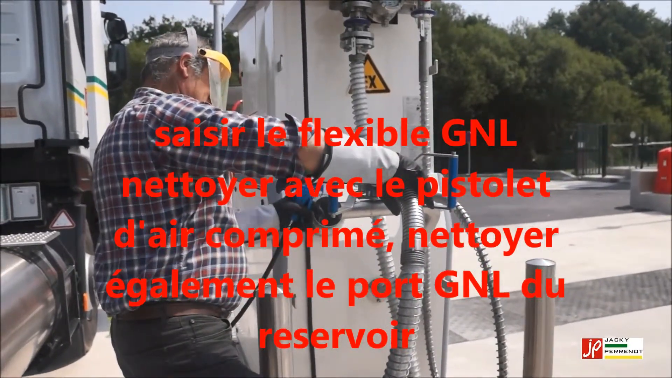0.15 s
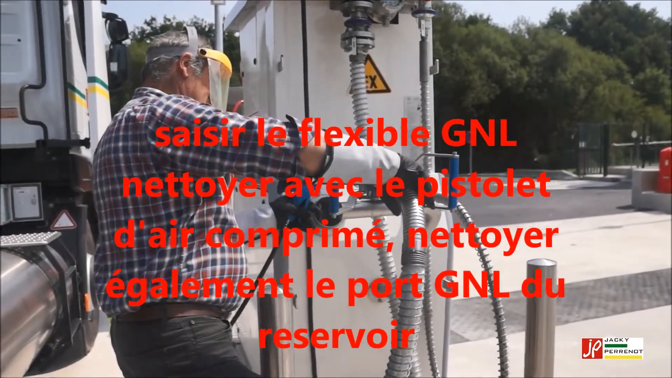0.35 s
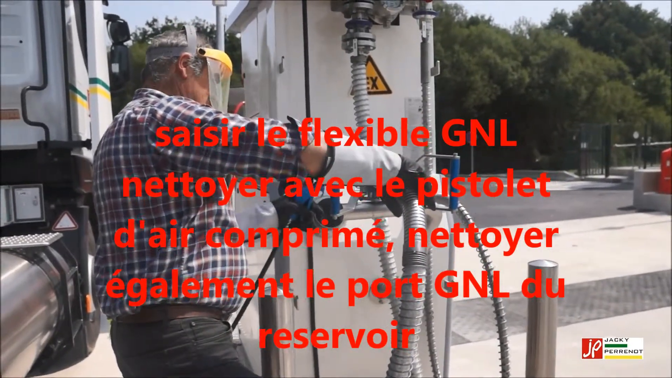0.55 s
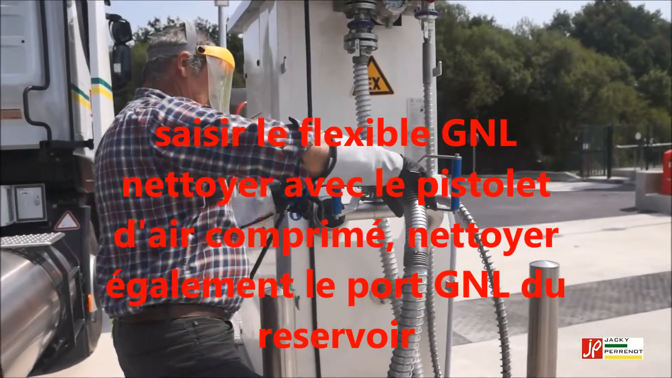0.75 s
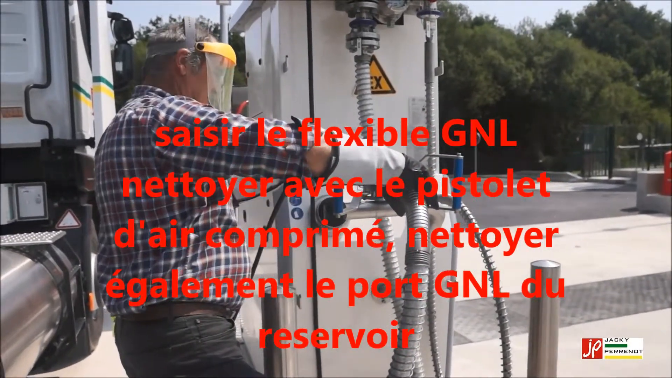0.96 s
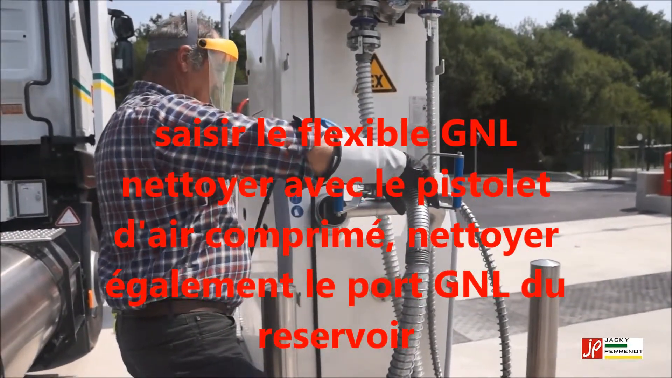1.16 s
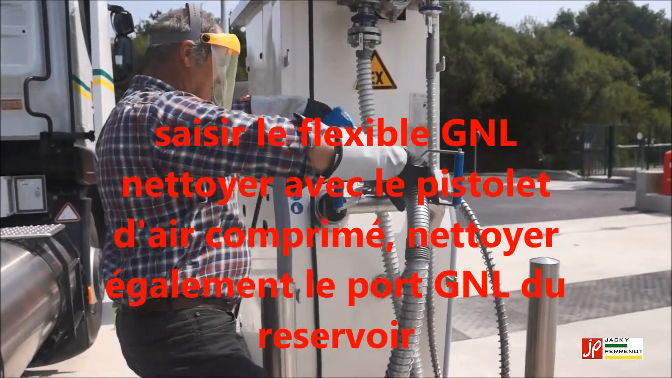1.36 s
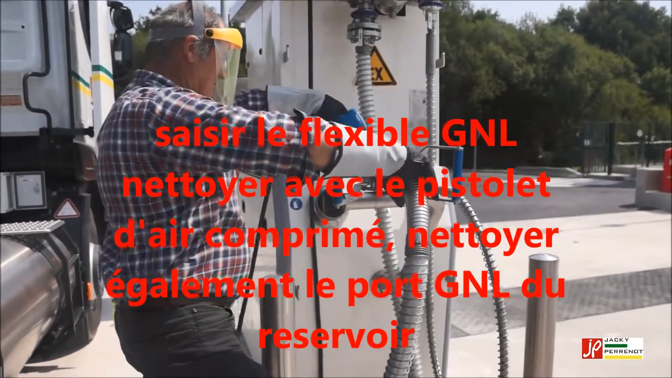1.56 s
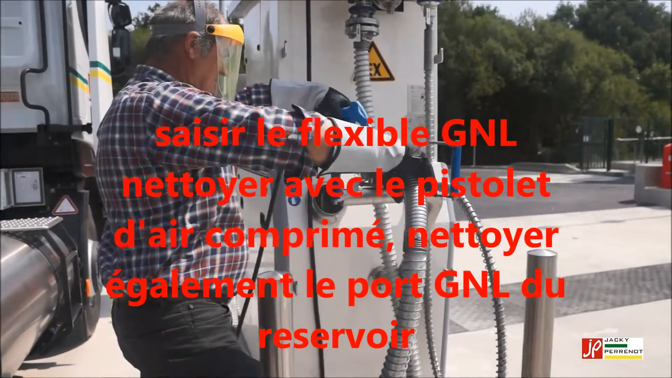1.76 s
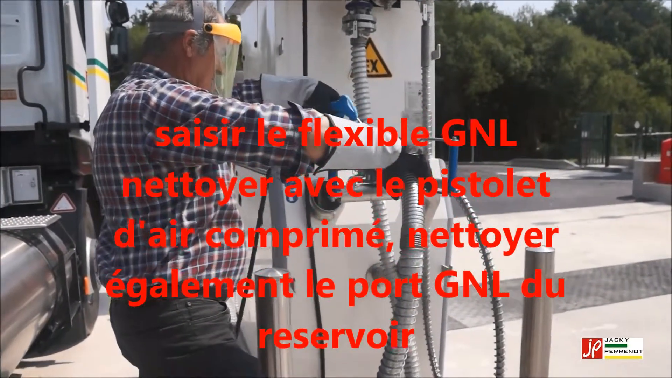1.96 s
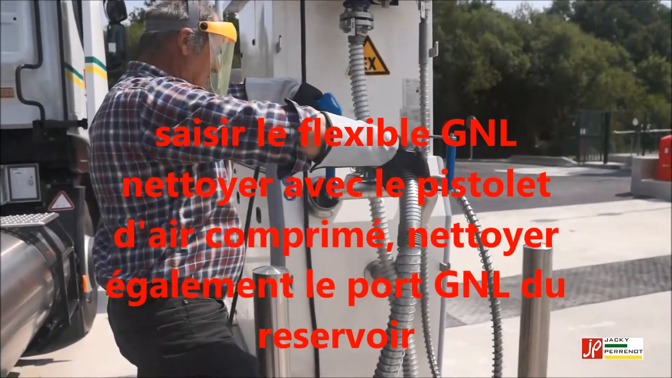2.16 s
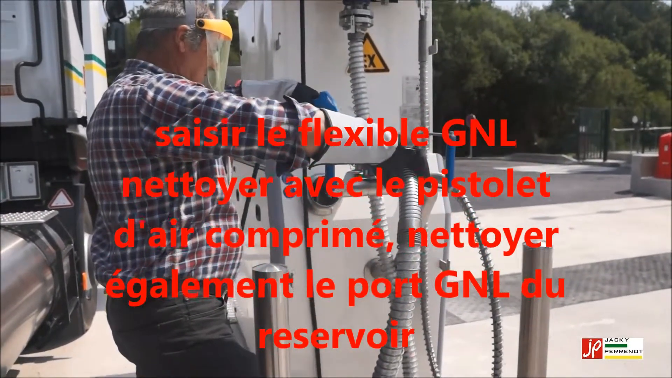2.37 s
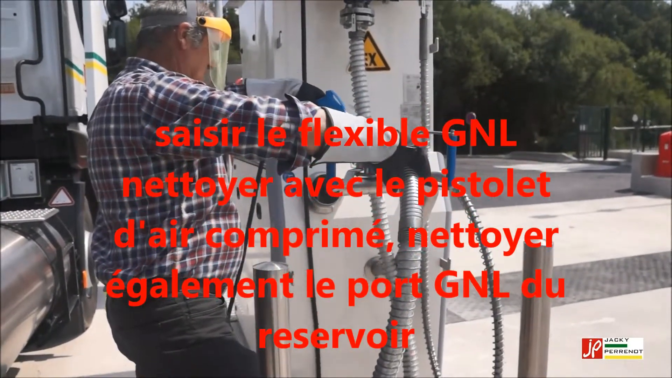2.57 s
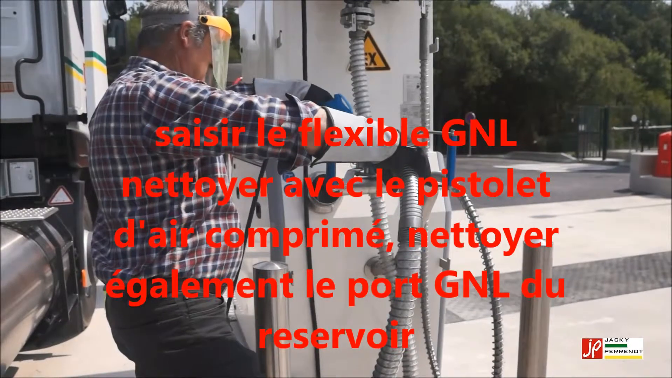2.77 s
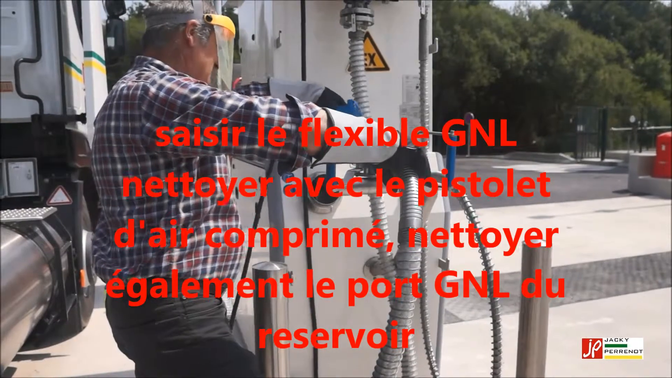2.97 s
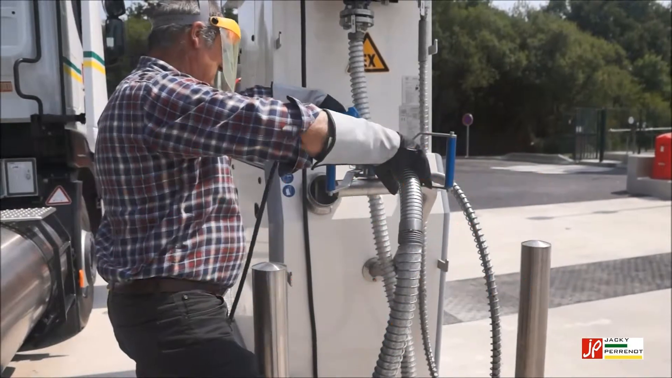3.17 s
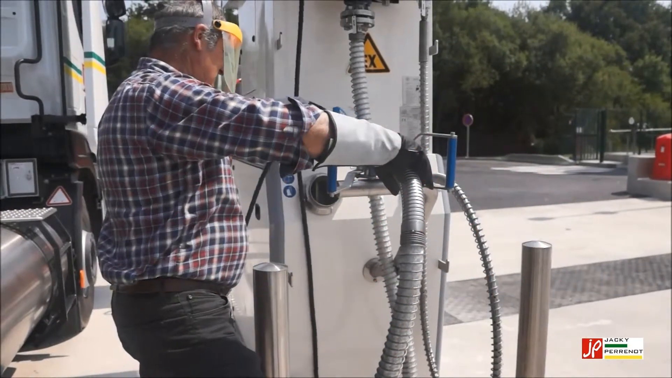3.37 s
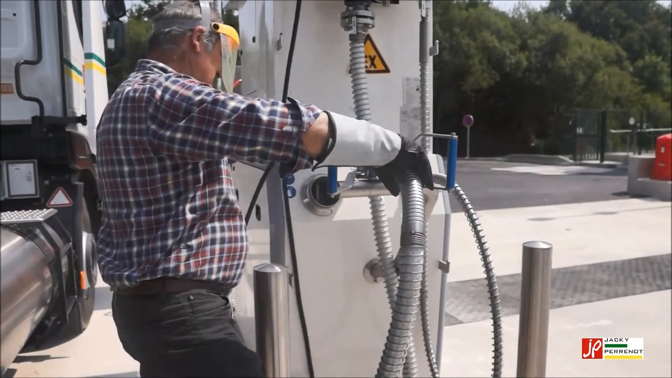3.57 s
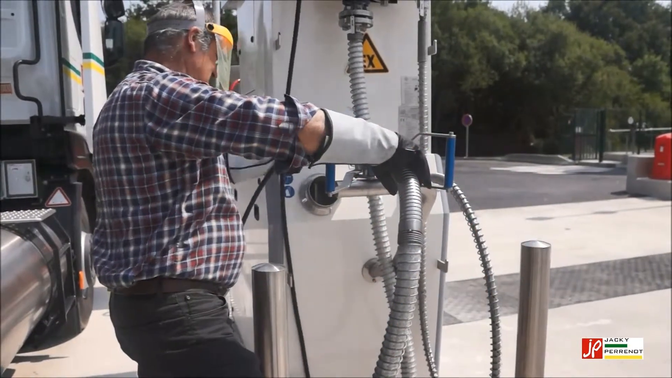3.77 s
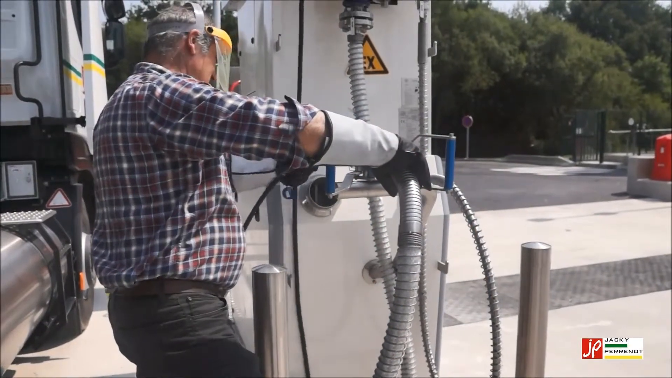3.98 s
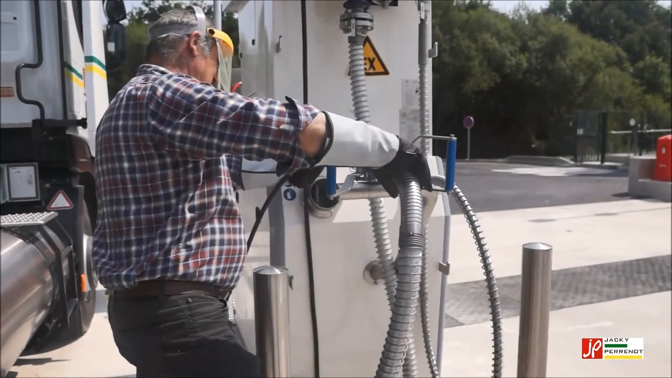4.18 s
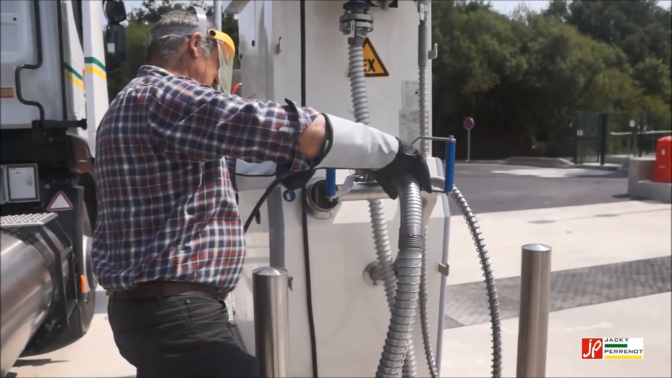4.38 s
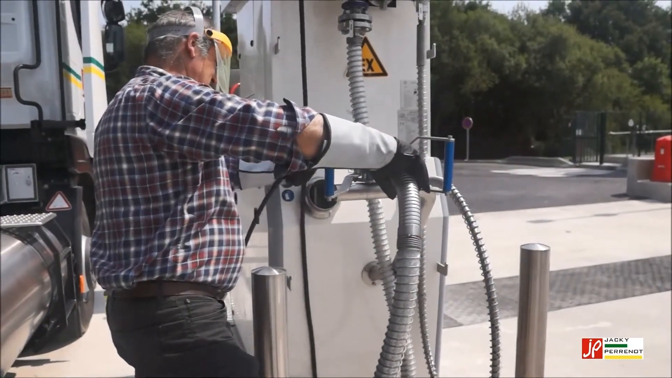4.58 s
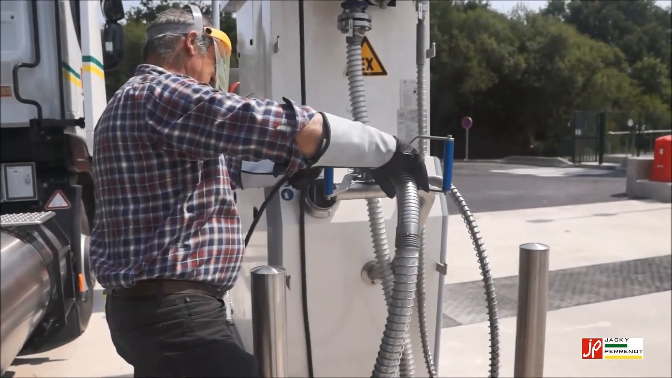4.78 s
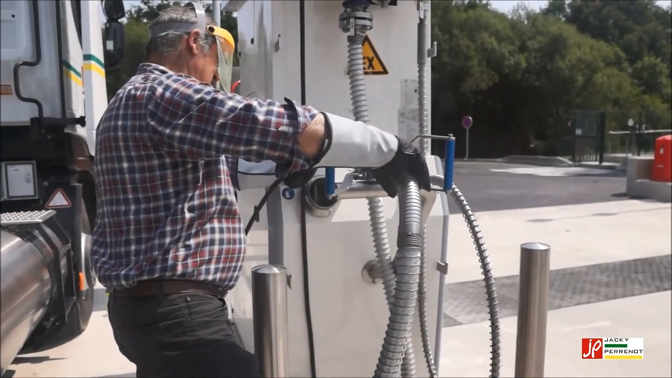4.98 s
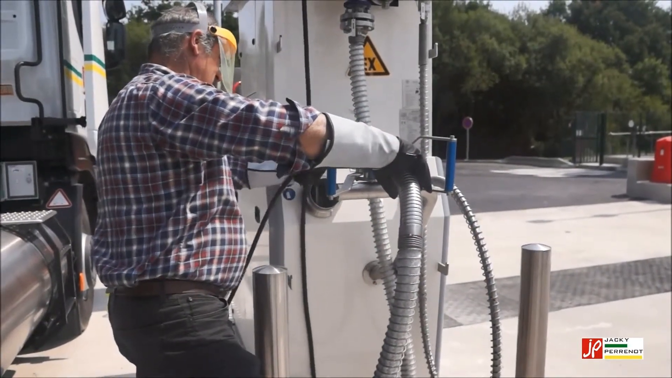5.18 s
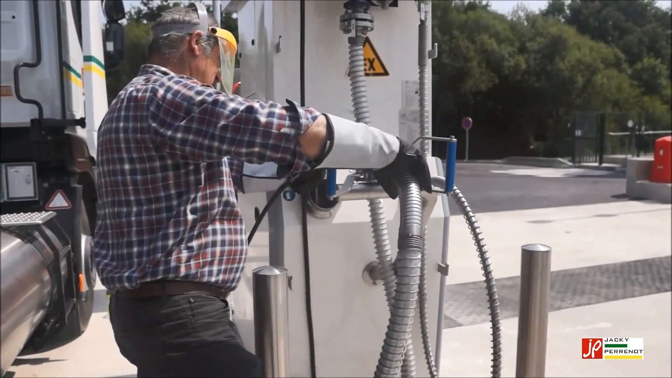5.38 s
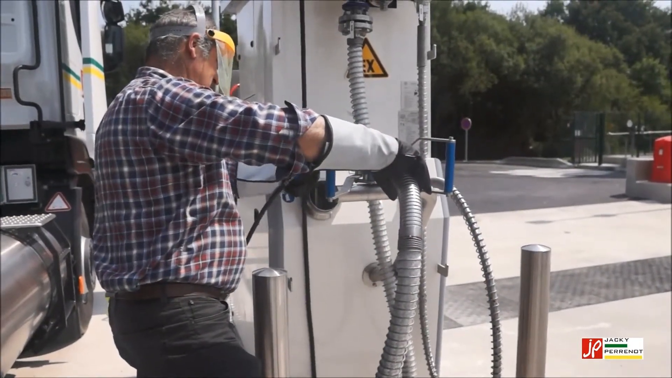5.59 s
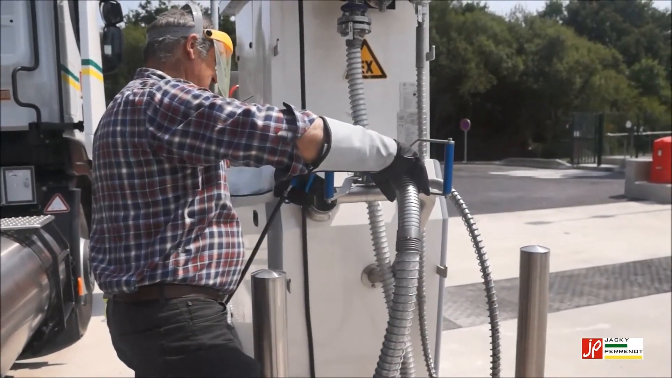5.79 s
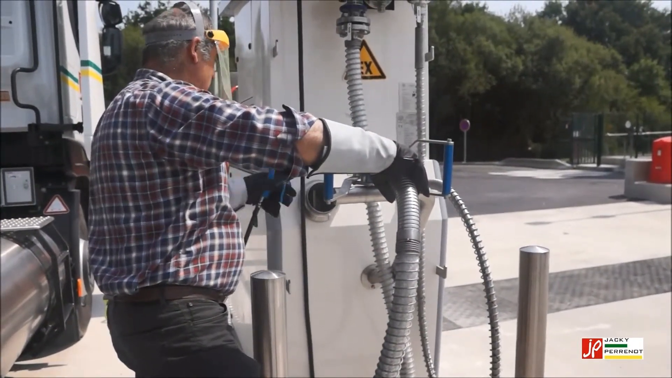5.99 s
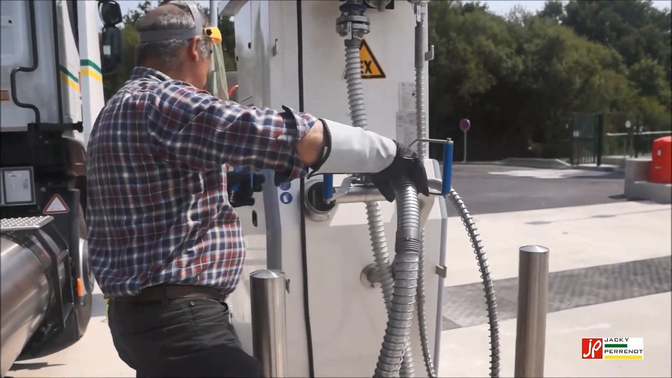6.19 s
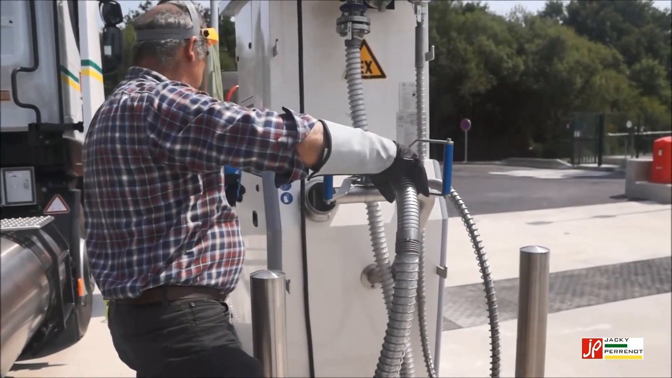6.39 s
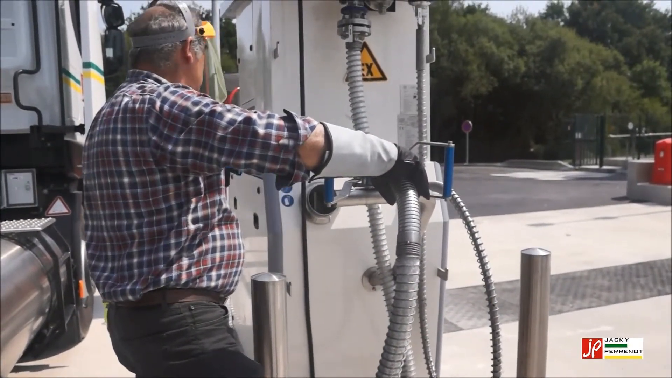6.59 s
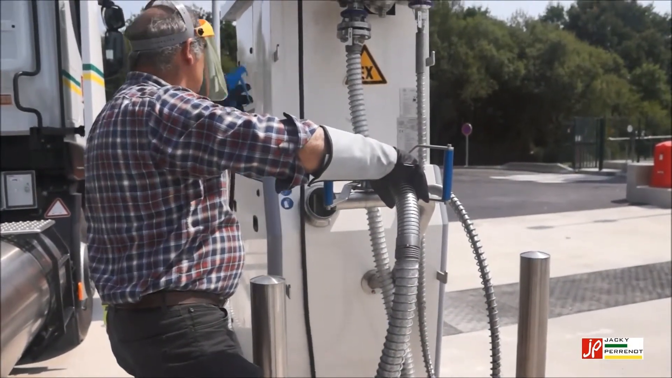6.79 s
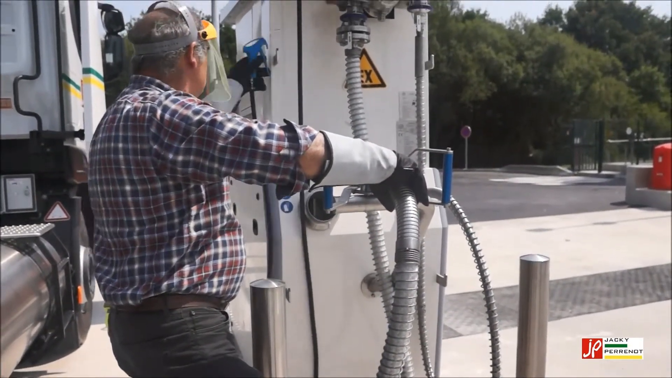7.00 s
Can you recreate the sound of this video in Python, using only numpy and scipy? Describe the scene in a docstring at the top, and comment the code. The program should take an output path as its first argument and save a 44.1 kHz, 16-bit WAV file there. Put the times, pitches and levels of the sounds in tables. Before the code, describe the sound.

Harsh, bright air blasts sweep over hollow metal fittings, whistling at the edges, before stopping abruptly over a quiet droning machine outdoors.

```python
"""A compressed-air blow gun cleans a fuel nozzle, mouth then side, and then a port, outdoors by a hum.
From the start, shaped noise hisses, rushes in hollows and sings on rims as a swept jet catches on them;
wavering sines in droning rumble make the machine hum. From about 3.9 s narrow noise bands whistle in the port.
At 5.7 s the valve shuts and a dull rush bleeds away; the hum remains, with rubs of resonated noise from
the hose and, near 6.6 s, two gliding sines as a bird's chirp. Echoes and scatter surround the gun and hose."""
import sys
import numpy as np
from scipy import signal
from scipy.fft import rfft, irfft
from scipy.io import wavfile

SR = 44100
rng = np.random.default_rng(int(sys.argv[2]) if len(sys.argv) > 2 else 0)


def wrap_up_sound(samples):
    """Save the sound to the file named by the first command line argument, as 16-bit audio."""
    columns = np.atleast_2d(samples).T
    # keep every value between -1 and 1, then stretch to whole-number steps
    tamed = np.clip(columns, -1, 1)
    steps = np.round(tamed * 32767).astype(np.int16)
    wavfile.write(sys.argv[1], SR, steps)


N = 310464
TIME_S, BINS_HZ = np.arange(N) / SR, np.fft.rfftfreq(N, 1 / SR)
TO_SIDE_S, TO_PORT_S = 1.49, 3.53  # jet moves from nozzle mouth to side, then to port


def gain_of(db):
    """Decibels to amplitude."""
    return 10 ** (np.asarray(db) / 20)


def evened(x):
    """Scales to rms 1."""
    return x / np.sqrt(np.mean(x ** 2) + 1e-20)


def follow(rows):
    """Every column of a curve, interpolated at each sample."""
    t_s, *columns = np.transpose(rows)
    return [np.interp(TIME_S, t_s, column) for column in columns]


def read(points):
    """A spectrum at each bin, joined on a log-frequency axis."""
    hz, value = np.transpose(points)
    return np.interp(np.log(BINS_HZ + 1), np.log(hz + 1), value)


def lifts(modes):
    """The dB that a set of resonances adds at each bin."""
    return sum(db / (1 + (2 * (BINS_HZ - hz) / width_hz) ** 2) for hz, width_hz, db in modes)


def noise(db):
    """Noise of rms 1 with the given spectral shape in dB."""
    return evened(irfft(rfft(rng.standard_normal(N)) * gain_of(db), N))


def wander(rate_hz, size=4000):
    """Slow random curve of rms 1, joined from 2 * rate_hz points a second."""
    return evened(np.interp(TIME_S * 2 * rate_hz, np.arange(size), rng.standard_normal(size)))


def after(t_s, shift_s=0.11):
    """Rises smoothly from 0 to 1 around t_s."""
    return (1 + np.tanh((TIME_S - t_s) / shift_s)) / 2


def held(start_s, length_s):
    """Attack, hold and release of one event, from 0 to 1."""
    attack_s, let_go_s = 0.026, 0.032
    attack = (TIME_S - start_s) / attack_s
    release = (start_s + length_s - TIME_S) / let_go_s
    return np.clip(np.minimum(attack, release), 0, 1)


def resonate(x, hz, width_hz):
    """One-pole resonance of gain 1 whose centre follows the curve hz."""
    turn = np.exp(2j * np.pi * np.cumsum(hz * np.ones(N)) / SR)
    r = np.exp(-np.pi * width_hz / SR)
    return 2 * (turn * signal.lfilter([1 - r], [1, -r], x / turn)).real


def sideways(x, width):
    """A part of the sound that the two channels hear with opposite sign."""
    side = irfft(rfft(x) * gain_of(read(width)), N)
    return np.array([side, -side])


def scatter(x, t60_s, count):
    """Dense short reflections whose paths are renewed count times over the scene."""
    hop, size = N // count + 1, SR // 25
    taps = rng.standard_normal((count + 2, size)) * gain_of(-60 * TIME_S[:size] / t60_s)
    taps /= np.linalg.norm(taps, axis=1, keepdims=True)
    pieces = np.pad(x, (hop, (count + 2) * hop - N)).reshape(-1, hop)
    pieces = np.hstack([pieces[:-1], pieces[1:]]) * signal.windows.cosine(2 * hop)
    wet = signal.fftconvolve(pieces, taps, axes=1)
    out = np.zeros((count + 3) * hop + size)
    for k, piece in enumerate(wet):
        out[k * hop:k * hop + len(piece)] += piece
    return out[hop:hop + N]


def tail(x, t60_s, delay_s):
    """Diffuse reflections that die away, unrelated in the two channels."""
    t_s = TIME_S[:SR]
    taps = rng.standard_normal((2, SR)) * gain_of(-60 * t_s / t60_s) * (t_s > delay_s)
    return signal.fftconvolve(x[None], taps / np.linalg.norm(taps[0]), axes=1)[:, :N]


def aim():
    """The slow sweep plus every catch, slip and flare: levels of the air's parts, and the edge tone."""
    # hand sweep between catches: t/s, hiss/dB, fizz against hiss/dB, hollow rush/dB, rim tone/dB
    sweep = [(0.0, -20.5, 0, -22.0, -25.5), (0.35, -23.5, -1.5, -23, -22), (0.8, -22.5, -4.5, -27.0, -27),
             (1.25, -20.5, -3, -22.5, -26), (1.47, -24.0, 1, -22.5, -21), (1.55, -25.5, 1, -31, -27.5),
             (1.72, -24.5, -3, -28.5, -26.0), (2.0, -26, 3, -22, -26), (2.4, -22.0, 3, -26.5, -24.0),
             (2.75, -22, -4, -26.5, -23.5), (3.0, -24.5, 2, -27, -25), (3.3, -23, -0.5, -26, -23.5),
             (3.85, -20.0, 0.5, -24, -20), (4.06, -26, -8, -28.0, -21.5), (4.33, -22.5, -7, -30.5, -19.5),
             (4.65, -26, 0, -31, -16.5), (5.13, -21.5, 1, -29.5, -23.5), (5.68, -23, 4, -27, -22.5)]
    # jet catches a part: start/s, length/s, hiss change/dB, hollow change/dB, rim change/dB, edge f/Hz
    catches = [(0.058, 0.12, 4.0, 0.5, 5, 4930.0), (0.252, 0.108, 4.5, 2, 4.5, 4560),
               (0.377, 0.098, 3.5, 3.5, 6, 4330), (0.48, 0.093, 5, 0.0, 0.5, 4410.0),
               (0.601, 0.12, 3.5, 4.5, 4, 4460), (0.712, 0.18, 0.5, 6.5, 9, 4560.0),
               (0.865, 0.22, 4.5, 0.0, 6, 5160), (1.046, 0.14, -1.5, 3, 7.5, 4940.0),
               (1.156, 0.066, 3.5, 4.5, 8, 4410.0), (1.262, 0.16, 0.5, 2.5, 7, 4140),
               (1.462, 0.058, 1.5, 2.5, 2.5, 4870.0), (1.754, 0.13, 3.5, 1, 0.5, 4990.0),
               (1.88, 0.1, 2.5, 1.5, 5, 4370), (1.981, 0.041, 1, 1, 2, 4370.0),
               (2.031, 0.076, 2.0, -0.5, 8, 4330.0), (2.138, 0.1, 4.5, -1, 2.5, 4580.0),
               (2.29, 0.069, 3, -4, 3.0, 5190.0), (2.491, 0.081, 4.5, -3, -1.5, 5160.0),
               (2.58, 0.1, 1, 1.5, 2, 4570.0), (2.766, 0.1, 3, 3.5, 0.5, 4500),
               (2.831, 0.077, 0.0, 4, 5, 4990.0), (3.394, 0.1, 2.5, 0.5, 2, 4770),
               (3.525, 0.083, 1.5, 7.5, 5.5, 4630), (3.666, 0.17, -0.5, 2.0, 0.0, 4360),
               (3.853, 0.17, 1.5, 7.5, 2, 4800), (3.972, 0.11, 4.5, -3.5, 6.5, 5250),
               (4.06, 0.23, 4.5, 5.5, 2.5, 4630), (4.363, 0.081, 0.5, 11.5, 5.0, 4350),
               (4.43, 0.11, 4, 11, 0.5, 4600), (4.519, 0.2, 7, 5, -2.5, 4830), (4.681, 0.15, 4, 8, 1, 4760),
               (4.895, 0.2, 0.5, 7, 5.5, 4670.0), (5.19, 0.057, 2.5, 7.0, 7, 4660),
               (5.287, 0.165, 1, 4, 6.5, 4340), (5.457, 0.16, -0.5, 1, 3.5, 4540.0),
               (5.612, 0.049, 1.5, 7.5, 10, 4400)]
    # top of the hiss flares up: start/s, length/s, fizz lift/dB
    flares = [(0.454, 0.19, 6.5), (0.681, 0.082, 15), (0.87, 0.184, 5), (2.539, 0.309, 7),
              (3.678, 0.167, 7), (4.203, 0.108, 12), (4.796, 0.053, 9)]
    # jet slips off the port's opening: start/s, length/s, hollow rush change/dB
    slips = [(4.0, 0.08, -1.5), (4.272, 0.085, -1), (4.833, 0.09, -2), (5.075, 0.13, -1)]
    slip_hiss_share, rest_hz = 0.44, 4950

    hiss_db, fizz_db, hollow_db, rim_db = follow(sweep)
    edge_hz = rest_hz
    for start_s, length_s, hiss_lift, hollow_lift, rim_lift, hz in catches:
        contact = held(start_s, length_s)
        hiss_db = hiss_db + hiss_lift * contact
        hollow_db = hollow_db + hollow_lift * contact
        rim_db = rim_db + rim_lift * contact
        edge_hz = edge_hz + (hz - rest_hz) * contact
    slip_db = sum(dip * held(start_s, length_s) for start_s, length_s, dip in slips)
    flare_db = sum(lift * held(start_s, length_s) for start_s, length_s, lift in flares)
    return hiss_db + slip_hiss_share * slip_db, fizz_db + flare_db, hollow_db + slip_db, rim_db, edge_hz


def blown(colour):
    """Turbulence coloured by the resonances of whichever part the jet is aimed at."""
    # resonances of the metal parts: f/Hz, width/Hz, lift/dB
    nozzle_mouth = [(960, 490, 5), (1485, 270, 3), (1780, 210, 6.5), (2136, 190, 6), (2480, 97, 5.5),
                    (2760, 75, 8), (3690, 1400, 4), (5840, 120, 5), (6840, 200, 3.5)]
    nozzle_side = [(904, 250, 4.7), (1520, 350, 3.1), (1810, 150, 3), (2600, 140, 1.1), (2900, 320, 2),
                   (3980, 230, 2.8), (4560, 150, 4.9), (5620, 160, 3.1), (6620, 340, 4.5)]
    port_modes = [(690, 90, 1.6), (887, 190, 5.2), (1576, 200, 4.9), (1803, 85, 5.8), (2116, 100, 4.7),
                  (2720, 120, 4.2), (4480, 240, 1.9), (9550, 220, 5.2)]
    side, port = after(TO_SIDE_S), after(TO_PORT_S)
    shares = (1 - side, side * (1 - port), port)  # of power
    aims = zip(shares, (nozzle_mouth, nozzle_side, port_modes))
    base_db = read(colour)
    return sum(np.sqrt(share) * noise(base_db + lifts(modes)) for share, modes in aims)


def free_jet(level_db, sharp_db, hiss_db=0.16, fizz_db=-1):
    """The hiss of the jet itself; its finest eddies add a fizz on top."""
    # noise spectra, relative: f/Hz, level/dB
    jet_colour = [(30, -47), (150, -24), (350, -24), (1500, -19.5), (5500, -9.5), (7200, -8.5), (8000, -4),
                  (9300, -1), (10400, 0), (11500, -5), (12500, -12.5), (14000, -7), (16000, -21)]
    fizz_colour = [(8000, -60), (12300, -11), (13200, -3.5), (14200, 0), (15800, -.5)]
    hiss = gain_of(hiss_db) * blown(jet_colour)
    fizz = gain_of(fizz_db + sharp_db) * noise(read(fizz_colour))
    return gain_of(level_db) * (hiss + fizz)


def hollow_rush(level_db, trim_db=-1.14, flutter_db=0.56):
    """A throaty rush, fluttering as the air enters and spills from a hollow."""
    # noise spectrum, relative: f/Hz, level/dB
    hollow_colour = [(30, -70.5), (120, -29), (320, -16), (520, -17.5), (660, -9), (1200, -7.5), (1500, -2),
                     (2000, -1.5), (3000, -3.5), (3900, -3), (8000, -33)]
    flutter = wander(rate_hz=35)
    return gain_of(level_db + trim_db + flutter_db * flutter) * blown(hollow_colour)


def rim_tone(level_db, hz, broad_db=-3.0, tone_db=-5, width_hz=550, waver=0.074, flutter_db=0.0,
             growth=0.52, port_db=-4):
    """The jet flaps across a rim: a bright rush with a fuzzy, wavering edge tone, weaker at the port."""
    # noise spectrum, relative: f/Hz, level/dB
    rim_colour = [(300, -62), (2200, -22), (2800, -18), (3500, -0.5), (4500, -0.5), (5700, 1), (6800, 1.5),
                  (7800, -8), (12000, -8.5)]
    rush = gain_of(broad_db) * blown(rim_colour)
    centre_hz = hz * (1 + waver * wander(rate_hz=56))
    tone = noise(read(rim_colour))
    for _ in range(2):
        tone = resonate(tone, centre_hz, 2 * width_hz)
    lock_db = growth * (level_db - np.median(level_db))  # tone stands out when the rim is hit squarely
    tone = gain_of(tone_db + lock_db + port_db * after(TO_PORT_S)) * evened(tone)
    return gain_of(level_db + flutter_db * wander(rate_hz=57)) * (rush + tone)


def blow_gun(unsteady_db=0.5):
    """One unsteady flow sags as the trigger eases; the valve shuts and a dull, toneless rush bleeds away."""
    ease_s, ease_db, ease_tones_db = 0.054, -4, -9
    release_s, valve_t60_s = 5.702, 0.036
    bleed_hiss_db, bleed_rush_db, bleed_t60_s = -25, -14, 0.73

    hiss_db, fizz_db, hollow_db, rim_db, edge_hz = aim()
    easing = np.clip(1 - (release_s - TIME_S) / ease_s, 0, 1)
    shut_s = np.maximum(TIME_S - release_s, 0)
    valve_db, bleed_db = -60 * shut_s / valve_t60_s, -60 * shut_s / bleed_t60_s
    hiss = gain_of(np.maximum(valve_db, bleed_hiss_db + bleed_db)) * free_jet(hiss_db, fizz_db)
    rush = gain_of(np.maximum(valve_db, bleed_rush_db + bleed_db)) * hollow_rush(hollow_db)
    tones = rim_tone(rim_db, edge_hz) + port_whistle((hollow_db + rim_db) / 2)
    tones = gain_of(valve_db) * tones
    air = gain_of(ease_db * easing) * (hiss + rush) + gain_of(ease_tones_db * easing) * tones
    return gain_of(unsteady_db * wander(rate_hz=20)) * air


def machine(lines_db=-2.0, rumble_db=-40, waver=0.00613, throb_db=2, left_db=0.9, lead_rad=0.17):
    """A running machine to the left: wavering lines, leading in phase there, in a droning rumble."""
    # hum lines, relative: f/Hz, level/dB
    hum = [(100.7, -63), (166, -52), (182, -52), (218.8, -45), (381, -52.5), (434, -50.5), (666, -55),
           (840, -68), (1002, -58.5)]
    # rumble spectrum, relative: f/Hz, level/dB
    rumble_colour = [(15, -63.5), (25, -42), (66, -32), (98, -13.5), (131, -13.5), (163, -7), (213, -8.5),
                     (250, -14), (427, -13.5), (769, -9.5), (1000, -11.5), (2850, -28.5), (4150, -32),
                     (4500, -32), (15000, -47)]
    # drone resonances of the rumble: f/Hz, width/Hz, lift/dB
    drone = [(176, 25, 5.5), (338, 115, 8.5), (6300, 260, 9.5), (11800, 400, 7)]
    # level at which the hum is heard, held down under the loud hiss, recovering after it: t/s, level/dB
    hum_level = [(0, -4), (1.4, -6), (2.5, -5.5), (3.4, -1.5), (4.1, -7.5), (5.6, -4.5), (5.9, -1),
                 (6.3, -1.5), (6.7, 1), (7.04, 1.5)]
    # rumble, side against middle: f/Hz, level/dB
    rumble_width = [(60, -18), (180, -66), (550, -24), (1650, -0.5), (4970, -1), (15000, 1.5)]

    sides = np.array([[1], [-1]])  # left, right
    warped_s = np.cumsum(1 + waver * wander(rate_hz=7.9)) / SR
    lines = 0
    for hz, db in hum:
        line_gain = gain_of(db + throb_db * wander(rate_hz=3.5))
        lines = lines + line_gain * np.sin(2 * np.pi * hz * warped_s + lead_rad * sides)
    colour_db = read(rumble_colour) + lifts(drone)
    rumble = noise(colour_db) + sideways(noise(colour_db), rumble_width)
    level_db = follow(hum_level)[0] + left_db * sides
    return gain_of(level_db) * (gain_of(lines_db) * np.sqrt(2) * lines + gain_of(rumble_db) * rumble)


def forecourt(x, direct_db=-0.5, near_db=-8.5, truck_db=-14, far_db=-22, air_hz=7000):
    """Single echoes and shifting scatter from cabinet and man, a truck's short ring, a dull open-air tail."""
    # echoes from the cabinet and the man: delay to left/ms, delay to right/ms, gain
    echoes = [(.68, 0.696, 0.071), (1.149, 1.29, 0.02), (1.85, 1.3, 0.045), (2.9, 4.1, 0.18),
              (4.5, 4.55, 0.13)]
    paths = 1
    for left_ms, right_ms, gain in echoes:
        delays_s = np.array([[left_ms], [right_ms]]) / 1000
        paths = paths + gain * np.exp(-2j * np.pi * BINS_HZ * delays_s)
    direct = gain_of(direct_db) * irfft(rfft(x) * paths, N)
    near = scatter(x, t60_s=0.059, count=72)
    truck = tail(x, t60_s=0.22, delay_s=0.008)
    dulled = irfft(rfft(x) / (1 + (BINS_HZ / air_hz) ** 2), N)
    far = tail(dulled, t60_s=0.6, delay_s=0.02)
    return direct + gain_of(near_db) * near + gain_of(truck_db) * truck + gain_of(far_db) * far


def port_whistle(flow_db, drive=0.5, flicker_db=1.4, start_s=3.9, rise_s=0.071):
    """Narrow, airy pipe tones that flicker, and swell with the air crossing the port's rim and entering it."""
    # pipe tones, relative: f/Hz, width/Hz, level/dB
    whistles = [(2798, 60, -35.5), (4376, 100, -30.5), (4574, 90, -30)]
    pipes = 0
    for hz, width_hz, db in whistles:
        band_db = -20 * np.log10(1 + (1.26 * (BINS_HZ - hz) / width_hz) ** 2)
        pipes = pipes + gain_of(db + flicker_db * wander(rate_hz=12)) * noise(band_db)
    drive_db = drive * (flow_db - np.median(flow_db))
    return after(start_s, rise_s) * gain_of(drive_db) * pipes


def hose(trim_db=-2):
    """Brief rubs ring the metal hose."""
    # scrapes, relative: peak t/s, 1/e half-length/s, level/dB
    scrapes = [(5.99, .018, -52), (6.235, .025, -53), (6.6, 0.032, -53), (6.96, .02, -55)]
    # ring of the hose, relative: f/Hz, nominal width/Hz, level/dB
    hose_modes = [(5440, 250, -2), (6280, 200, -1)]
    rub = sum(gain_of(db) * np.exp(-((TIME_S - t_s) / length_s) ** 2) for t_s, length_s, db in scrapes)
    grit = rng.standard_normal(N)
    ring = 0
    for hz, width_hz, db in hose_modes:
        once = resonate(grit, hz, 2 * width_hz)
        ring = ring + gain_of(db) * resonate(once, hz, 2 * width_hz)
    return gain_of(trim_db) * rub * evened(ring)


def bird(direct_db=-8, near_db=-6, wet_db=-4):
    """Two quick gliding whistles, blurred and echoed by the yard."""
    # one list a chirp, levels relative: t/s, f/Hz, level/dB
    chirps = [
        [(6.555, 3896, -57), (6.566, 4270, -49), (6.578, 4255, -47), (6.586, 3770, -48), (6.596, 3480, -47),
         (6.604, 3320, -64)],
        [(6.621, 3300, -51), (6.631, 3570, -40), (6.639, 4320, -42), (6.644, 3380, -41), (6.654, 3080, -49)],
    ]
    song = np.zeros(N)
    for rows in chirps:
        hz, db = follow(rows)
        sounding = (TIME_S > rows[0][0]) & (TIME_S < rows[-1][0])
        song += sounding * gain_of(db) * np.sqrt(2) * np.sin(2 * np.pi * np.cumsum(hz) / SR)
    near = scatter(song, t60_s=0.059, count=24)
    wet = tail(song, t60_s=0.39, delay_s=0.012)
    return gain_of(direct_db) * song + gain_of(near_db) * near + gain_of(wet_db) * wet


def scene():
    """The gun and hose on the forecourt, over the machine and the bird."""
    # spread-out jet, side against middle: f/Hz, level/dB
    jet_width = [(250, -29), (500, -54), (1000, -15), (2000, -5), (4000, -9), (8000, -9), (12000, -11.5)]
    air = blow_gun()
    spread = sideways(scatter(air, t60_s=0.016, count=160), jet_width)  # eddies keep changing place
    return forecourt(air + hose()) + spread + machine() + bird()


def record(dry):
    """Two microphones differ a little in colour; the highest peaks are rounded; then the band limit."""
    # microphone colour: f/Hz, left minus right/dB
    lean = [(200, -1.6), (1000, 0), (2300, 0), (3500, 0), (4600, 1.5), (6500, 1), (7700, 0), (9000, -1),
            (11300, 2), (12700, 0), (15000, 1)]
    edge_hz = 15760
    coloured = irfft(rfft(dry) * gain_of(np.array([[.5], [-.5]]) * read(lean)), N)
    rounded = coloured / (1 + (coloured / .95) ** 8) ** (1 / 8)
    lowpass = signal.firwin(1023, edge_hz, window=("kaiser", 9), fs=SR)
    return signal.oaconvolve(rounded, lowpass[None], "same")


dry = scene()
out = record(dry)
wrap_up_sound(out)
```